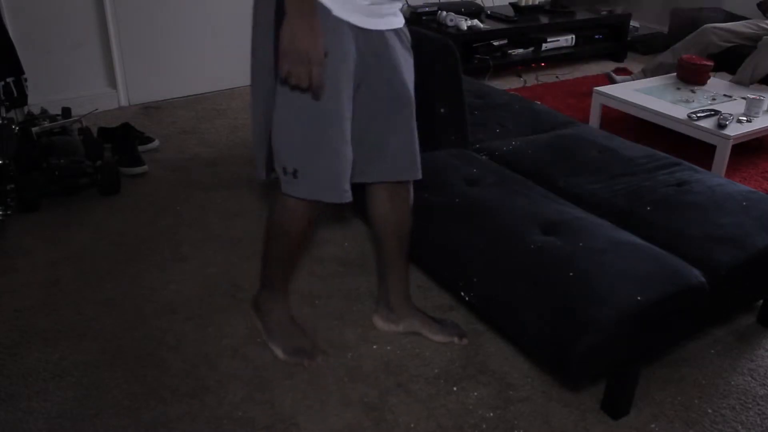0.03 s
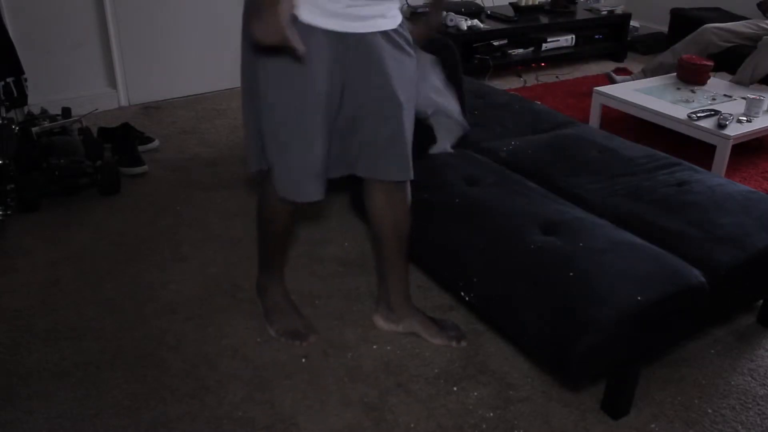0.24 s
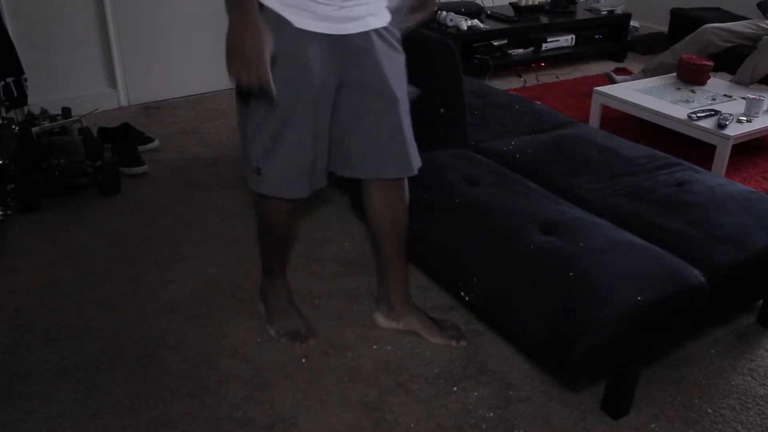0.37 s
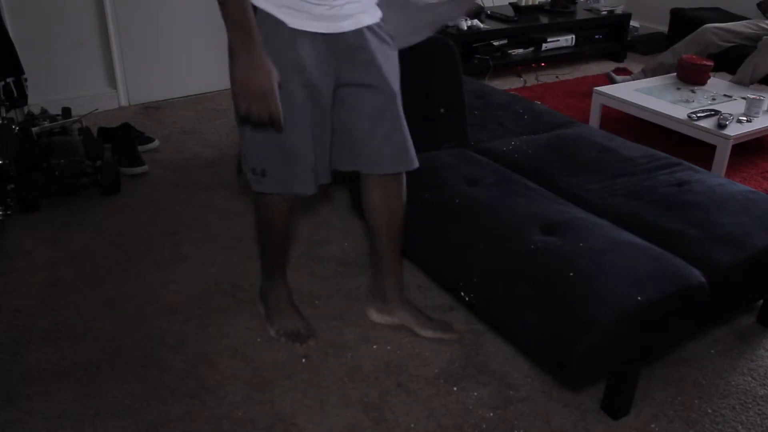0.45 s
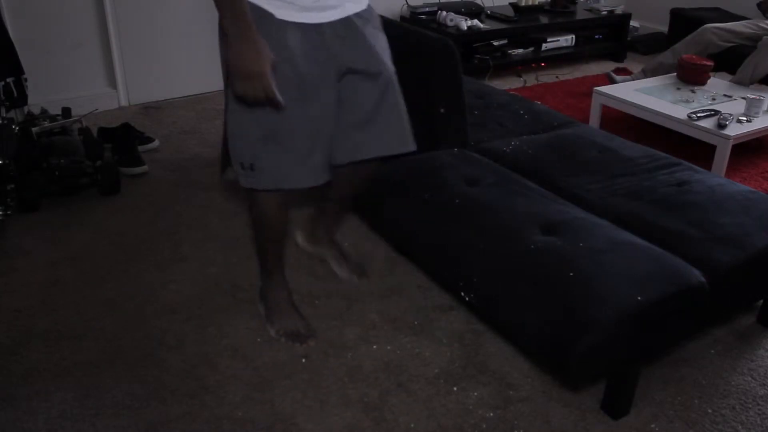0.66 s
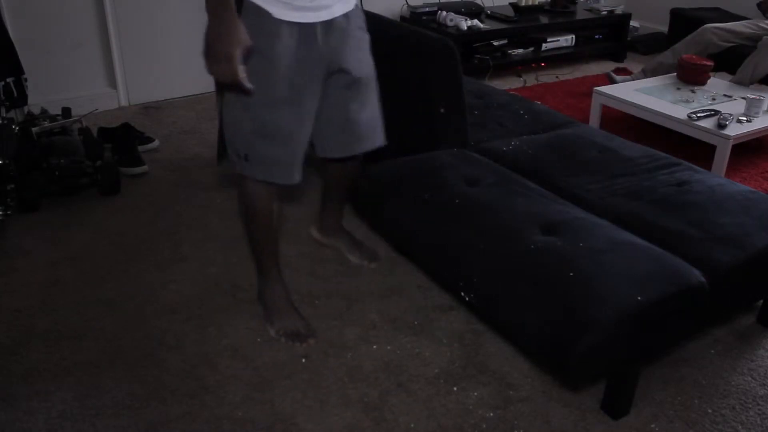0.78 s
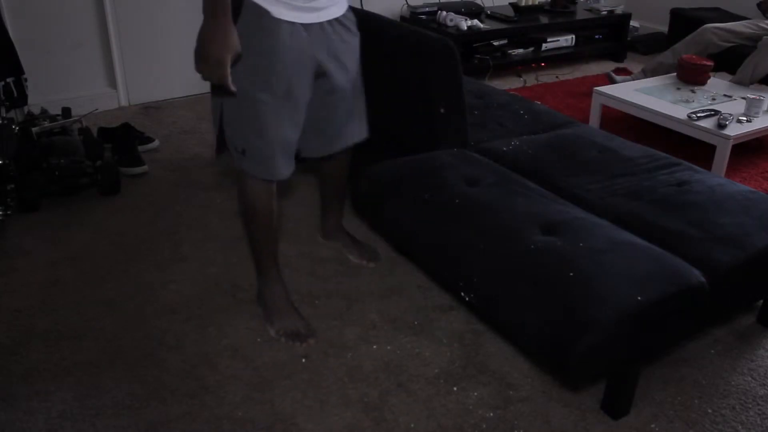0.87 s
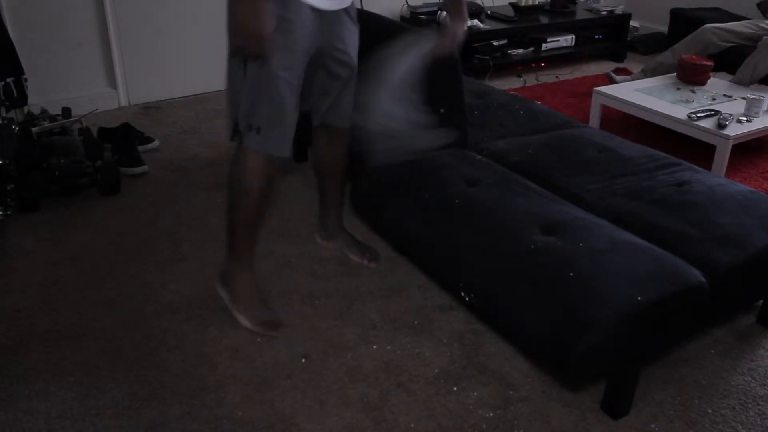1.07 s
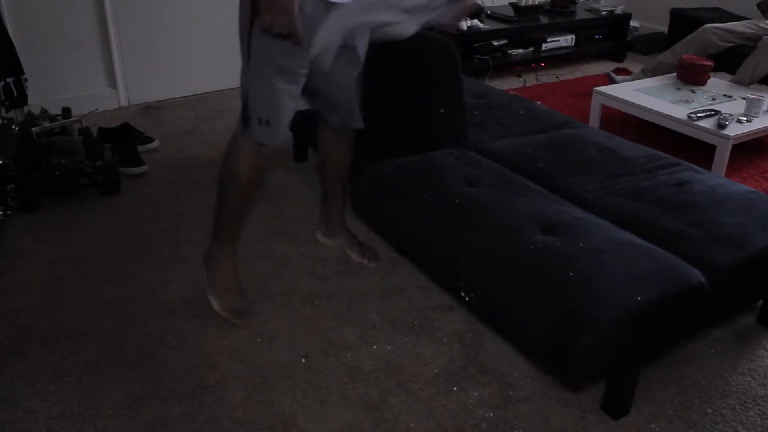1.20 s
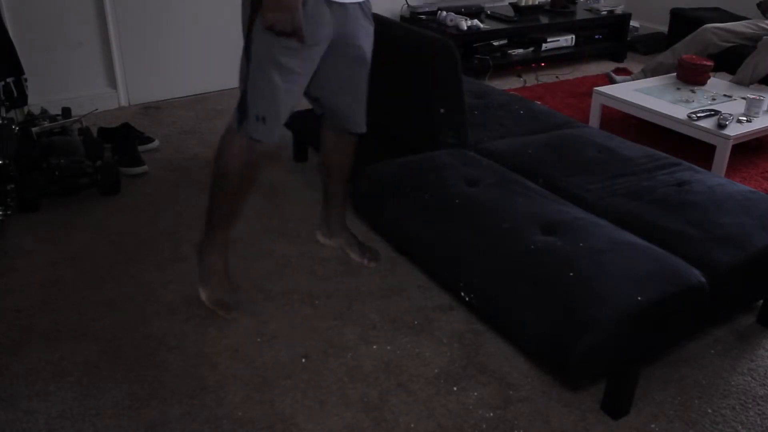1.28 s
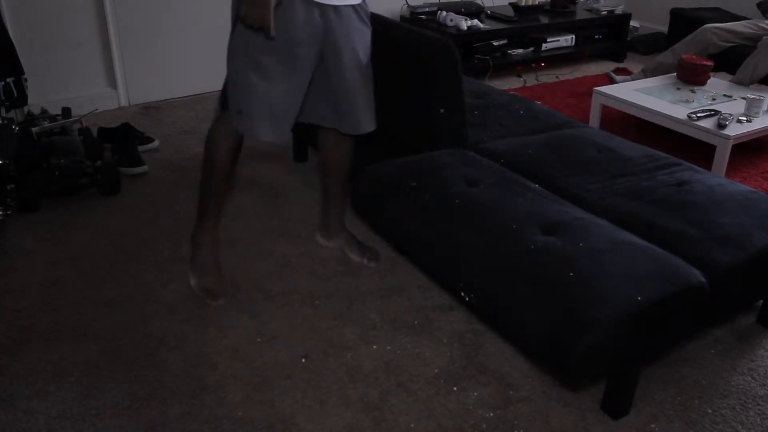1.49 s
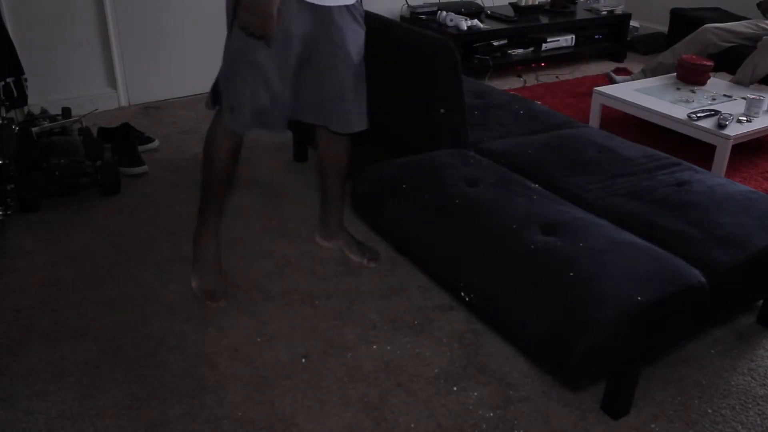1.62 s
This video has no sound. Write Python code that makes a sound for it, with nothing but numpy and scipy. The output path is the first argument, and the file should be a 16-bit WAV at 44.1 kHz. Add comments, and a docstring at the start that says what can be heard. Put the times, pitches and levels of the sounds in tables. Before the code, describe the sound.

A pillow thumps twice onto a futon over a faint room hum. Fabric swishes into the first, louder blow at 0.2 seconds, a cloth slap with a short, low boom. The pillow flops, the frame ticks at 0.5 seconds, and cloth softly drags away. The second thump lands at 1.1 seconds, followed by two small flops and faint swishes around 1.3 and 1.6 seconds.

```python
"""A soft heavy thing, probably a pillow, is swung down twice onto a futon in a small carpeted room.
Over a faint hum, fabric swishes. At 0.21 s the first blow lands: a cloth slap over the damped boom of
mattress and frame. The pillow flops, the frame ticks at 0.48 s, and the pillow is dragged off and lifted.
At 1.10 s the second blow lands; the pillow flops twice and settles with two last swishes.
The blows ring the room's low resonances and just overload the microphone."""
import sys
import numpy as np
from scipy import signal
from scipy.fft import rfft, irfft, next_fast_len
from scipy.io import wavfile
from scipy.ndimage import map_coordinates

SR = 44100
rng = np.random.default_rng(int(sys.argv[2]) if len(sys.argv) > 2 else 0)


def unload_wav(signal):
    """Save mono or channel-first audio to the path in sys.argv[1] as 16-bit WAV at rate SR, clipped to [-1, 1]."""
    wavfile.write(
        sys.argv[1],
        SR,
        np.round(np.clip(np.atleast_2d(signal).T, -1, 1) * 32767).astype(np.int16),
    )


N = 72765

# Noise spectra. Each row: frequency in Hz, relative level in dB.
HUM_SPECTRUM = [(12, -42), (20, -10), (70, -0.5), (103, -9.5), (185, 0.5), (324, -6.5), (382, -4),
                (631, -13), (686, -13.5), (1160, -16), (1270, -16.5), (1580, -20.5), (1770, -18.5),
                (1920, -22.5), (2760, -27), (4190, -30), (4550, -30.5), (7110, -35.5), (15500, -37.5)]
SWISH_SPECTRUM = [(150, -24), (500, 4.5), (1200, 4.5), (2000, 0.5), (3500, -4.5), (6000, -13), (10000, -23),
                  (16000, -24)]
CRACKLE_SPECTRUM = [(800, -18), (2200, 4.5), (3700, 5.5), (5200, -0.5), (8000, -4), (11000, -9),
                    (16000, -12.5)]
FLOP_SPECTRUM = [(300, 4.5), (900, 0), (2000, -7.5), (4000, -13), (8000, -27.5), (16000, -37)]
THUD_SPECTRUM = [(20, -33), (45, -1), (65, 5), (95, -10.5), (120, 1), (160, 0), (220, -8.5), (300, 4.5),
                 (500, -22), (1500, -76)]
TICK_SPECTRUM = [(200, -15), (700, 6), (1200, 19), (2500, -4), (4200, -6), (7000, -27), (16000, -41)]
DRAG_SPECTRUM = [(500, -25), (1300, -3), (2000, 2.5), (2600, -2), (3400, -5.5), (4500, -12), (7000, -21.5),
                 (16000, -45)]
# Fabric moving through air. Each row: peak time, rise width and fall width in seconds, level in dB,
# treble tilt in dB per octave.
SWISH_EVENTS = [(.2, 0.033, 0.023, -45, 0.5), (.555, 0.02, 0.034, -51, 5), (.62, 0.065, 0.042, -47, -2),
                (.87, 0.023, .09, -52, 2.5), (1.106, 0.043, .02, -40.5, 1.5),
                (1.27, 0.15, .055, -42.5, -8.5), (1.588, .03, 0.018, -51, 3.5)]
# Pillow blows. Each row: start, rise, slap hold and slap T60 in seconds, slap level in dB,
# boom hold at 167 Hz, crackle rise and crackle hold in seconds, crackle level in dB.
BLOW_EVENTS = [(.2083, .002, 0.0081, 0.067, -11, 0.018, 0.00067, 0.0017, -27),
               (1.104, 0.0077, .014, .1, -13.5, .014, 0.015, 0.017, -29.5)]
# Slap colour at the two spots hit. Each row: frequency in Hz, relative dB at the first, at the second.
SLAP_SPECTRA = [(119, -30, -26), (273, 8, 0.5), (456, -1, 7), (654, 2.5, -6), (1080, -7, -0.5),
                (1500, -17, -5), (1783, -5, -3), (2650, -16.5, -19.5), (3660, -19, -17), (5130, -28, -33.5),
                (8700, -42, -36), (16000, -64, -55)]
# Mattress and frame. Each row: frequency in Hz, level in dB at the first spot, at the second.
FUTON_MODES = [(59.3, -35, -24), (91.3, -18, -24), (164.8, -3.5, -14), (222.3, -13, -16.5),
               (318.4, -16, -13.5), (404, -19, -15.5), (511, -32, -12.5), (615, -24, -39),
               (786, -18, -45.5), (923, -19.5, -39), (1035, -53, -23)]
# Low room resonances. Each row: frequency in Hz, level in dB after the first blow, after the second.
ROOM_BOOM_MODES = [(158, -24, -40), (182, -31, -43), (223, -34, -33), (297, -34, -37)]
# Room decay. Each row: frequency in Hz, T60 in seconds.
TAIL_T60_S = [(60, 0.62), (160, 0.28), (500, 0.31), (2000, .38), (6000, 0.42), (15000, 0.16)]
# Room tail strength. Each row: frequency in Hz, gain in dB.
TAIL_GAIN_DB = [(50, -5.5), (160, -15.5), (400, -13), (600, -10.5), (1200, -5.5), (4000, -13.5),
                (15000, -6.5)]
# Cloth folds snapping. Each row: start in seconds, level in dB.
FLICK_EVENTS = [(0.2101, -24), (0.2165, -31), (.263, -45), (0.276, -40), (1.112, -27.5), (1.124, -25),
                (1.2236, -34), (1.236, -33)]
# Pillow falling back. Each row: start, rise, hold and T60 in seconds, cloth level in dB,
# treble tilt in dB per octave, thud level in dB.
FLOP_EVENTS = [(0.268, 0.0068, 0.0058, 0.34, -32, -1, -29), (1.143, 0.0054, .02, 0.51, -30, 1, -31.5),
               (1.228, 0.0019, 0.015, 0.14, -35, 2, -34)]


def amp(db):
    """Decibels to gain."""
    return 10 ** (np.asarray(db) / 20)


def along(points, hz):
    """Interpolate (Hz, value) points on a log axis."""
    knots_hz, values = np.transpose(points)
    return np.interp(np.log(hz + 1), np.log(knots_hz + 1), values)


def since(start_s):
    """Seconds after the start, zero before it."""
    return np.maximum(np.arange(N) / SR - start_s, 0)


def filtered(x, response):
    """Apply a gain given as a function of Hz."""
    size = next_fast_len(N + SR // 2)
    return irfft(rfft(x, size) * response(np.fft.rfftfreq(size, 1 / SR)), size)[:N]


def noise(spectrum, tilt_db=0, grain_db=0):
    """Coloured noise of rms 1, its strength scattered by grain_db each millisecond."""
    time_ms = np.arange(N) * 1000 / SR
    grains = amp(grain_db * map_coordinates(rng.standard_normal(N), [time_ms], order=1))
    colour = lambda hz: amp(along(spectrum, hz) + tilt_db * np.log2(1 + hz / 1000))
    x = filtered(rng.standard_normal(N) * grains, colour)
    return x / np.sqrt(np.mean(x ** 2) + 1e-20)


def ring(hz):
    """Sine of random phase."""
    return np.sin(2 * np.pi * (hz * since(0) + rng.random()))


def envelope(start_s, rise_s, hold_s, t60_s):
    """Linear rise, hold, exponential release."""
    attack = np.minimum(since(start_s) / max(rise_s, 1e-4), 1)
    return attack * amp(-60 * since(start_s + rise_s + hold_s) / t60_s)


def hum(level_db=-42):
    """Steady low room noise."""
    return amp(level_db) * noise(HUM_SPECTRUM)


def swishes():
    """Fabric noise swells and fades with each movement."""
    t = since(0)
    out = np.zeros(N)
    for peak_s, rise_s, fall_s, db, tilt_db in SWISH_EVENTS:
        width_s = np.where(t < peak_s, rise_s, fall_s)
        swell = np.exp(-((t - peak_s) / width_s) ** 2 / 2)
        out += amp(db) * swell * noise(SWISH_SPECTRUM, tilt_db, grain_db=1)
    return out


def blows():
    """Cloth slaps and crackles; the futon's modes are driven while the pillow presses in, then die."""
    out = np.zeros(N)
    for spot, (start_s, rise_s, slap_hold_s, slap_t60_s, slap_db, boom_hold_s,
               crackle_rise_s, crackle_hold_s, crackle_db) in enumerate(BLOW_EVENTS):
        slap_spectrum = [(hz, spot_db[spot]) for hz, *spot_db in SLAP_SPECTRA]
        slap = amp(slap_db) * noise(slap_spectrum, grain_db=3.5)
        out += slap * envelope(start_s, rise_s, slap_hold_s, slap_t60_s)
        crackle = amp(crackle_db) * noise(CRACKLE_SPECTRUM, grain_db=1.5)
        out += crackle * envelope(start_s, crackle_rise_s, crackle_hold_s, t60_s=0.092)
        for hz, *spot_db in FUTON_MODES:
            hold_s = boom_hold_s * (167 / hz) ** 0.22  # higher modes are driven more briefly
            out += amp(spot_db[spot]) * ring(hz) * envelope(start_s, rise_s, hold_s, t60_s=0.053)
    return out


def room_boom():
    """Each blow excites the room's low resonances."""
    out = np.zeros(N)
    for spot, (start_s, *_) in enumerate(BLOW_EVENTS):
        swell = envelope(start_s, rise_s=0.025, hold_s=0.056, t60_s=0.2)
        for hz, *spot_db in ROOM_BOOM_MODES:
            out += amp(spot_db[spot]) * ring(hz) * swell
    return out


def room_tail(x, build_s=0.0099):
    """Short diffuse reflections, dying fastest in the top treble."""
    hz, t, spectra = signal.stft(rng.standard_normal(SR // 2), SR, nperseg=512)
    t60_s = along(TAIL_T60_S, hz)[:, None]
    unit_energy = np.sqrt(2 * np.log(1000) / (t60_s * SR))
    gain = amp(along(TAIL_GAIN_DB, hz))[:, None] * unit_energy
    tail = signal.istft(spectra * gain * amp(-60 * t / t60_s), SR, nperseg=512)[1]
    tail *= np.minimum(np.arange(len(tail)) / SR / build_s, 1)
    return signal.fftconvolve(x, tail)[:N]


def flicks():
    """Loose folds of cloth snap against the cover."""
    return sum(amp(db) * noise(CRACKLE_SPECTRUM)
               * envelope(start_s, rise_s=0.00043, hold_s=0, t60_s=0.014)
               for start_s, db in FLICK_EVENTS)


def flops():
    """The pillow drops back with a brush of cloth and a dull thud."""
    out = np.zeros(N)
    for start_s, rise_s, hold_s, t60_s, cloth_db, tilt_db, thud_db in FLOP_EVENTS:
        cloth = amp(cloth_db) * noise(FLOP_SPECTRUM, tilt_db, grain_db=2)
        thud = amp(thud_db) * noise(THUD_SPECTRUM)
        out += (cloth + thud) * envelope(start_s, rise_s, hold_s, t60_s)
    return out


def frame_tick(level_db=-37):
    """The frame knocks lightly as the weight comes off."""
    knock = envelope(start_s=0.477, rise_s=0.00047, hold_s=0, t60_s=0.06)
    return amp(level_db) * noise(TICK_SPECTRUM) * knock


def drag(level_db=-47):
    """Cloth slides over cloth as the pillow is lifted."""
    slide = envelope(start_s=0.5315, rise_s=0.043, hold_s=0.079, t60_s=0.22)
    return amp(level_db) * noise(DRAG_SPECTRUM, grain_db=2.5) * slide


def scene():
    """Mono mix; only the impacts feed the room tail."""
    impacts = blows() + flops() + flicks() + frame_tick()
    return (impacts + room_tail(impacts) + room_boom() + swishes() + drag() + hum())[None]


def record(dry):
    """The microphone cuts deep bass, flattens the highest peaks and limits the band."""
    low_cut_hz, top_hz = 23, 15900
    ceiling, hardness = 1.03, 19
    x = signal.sosfilt(signal.butter(2, low_cut_hz, "high", fs=SR, output="sos"), dry[0])
    clipped = x / (1 + np.abs(x / ceiling) ** hardness) ** (1 / hardness)
    return filtered(clipped, lambda hz: hz < top_hz)[None]


dry = scene()
out = record(dry)
unload_wav(out)
```